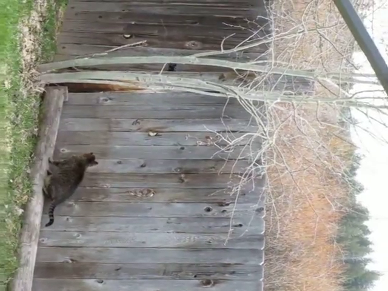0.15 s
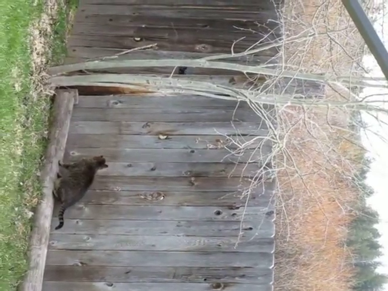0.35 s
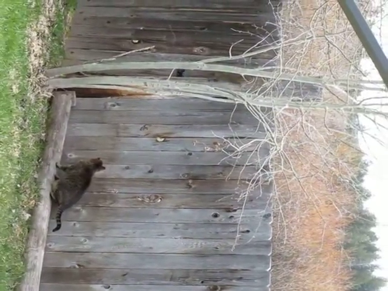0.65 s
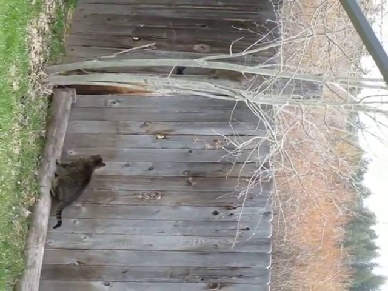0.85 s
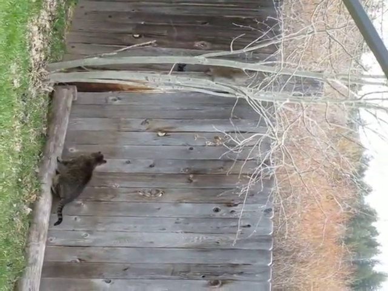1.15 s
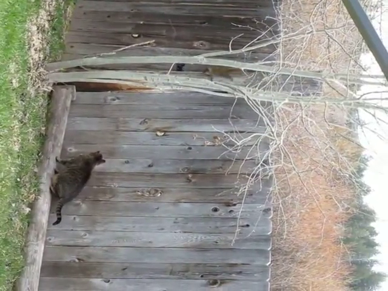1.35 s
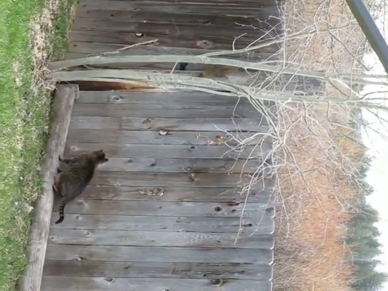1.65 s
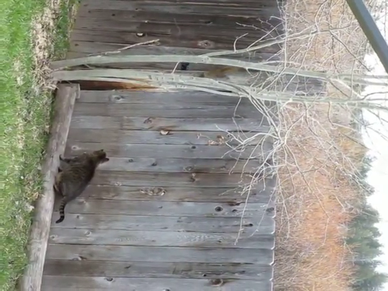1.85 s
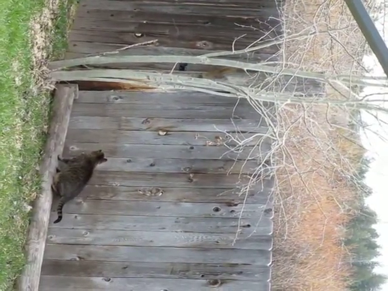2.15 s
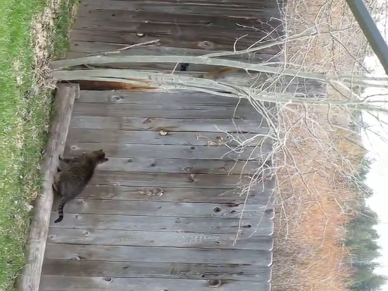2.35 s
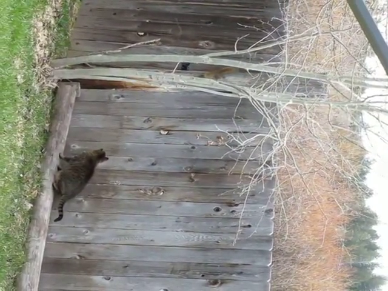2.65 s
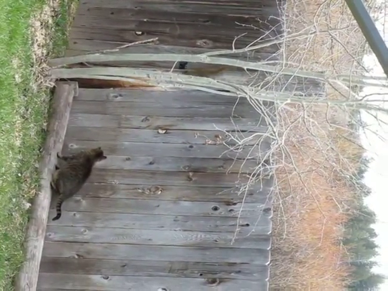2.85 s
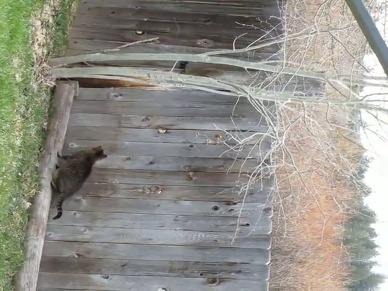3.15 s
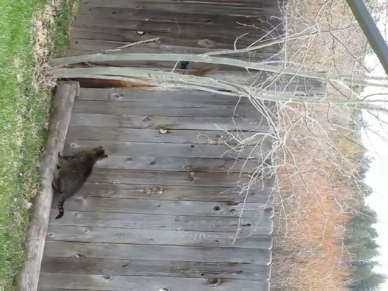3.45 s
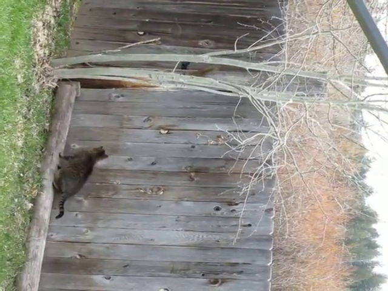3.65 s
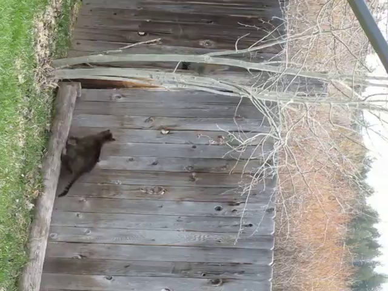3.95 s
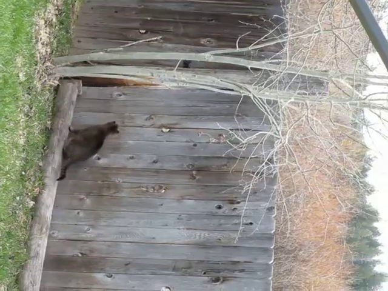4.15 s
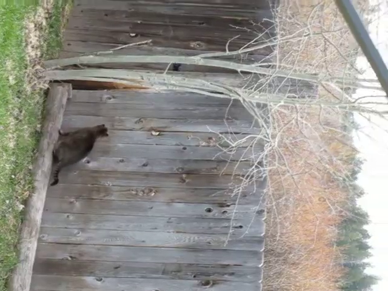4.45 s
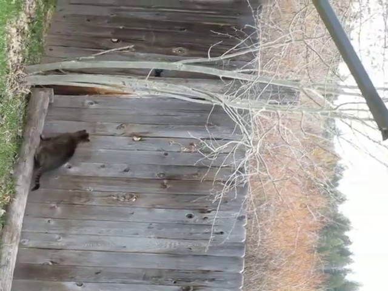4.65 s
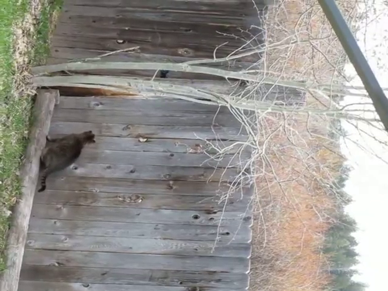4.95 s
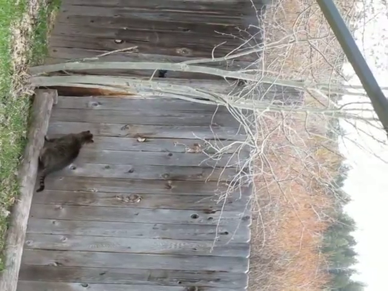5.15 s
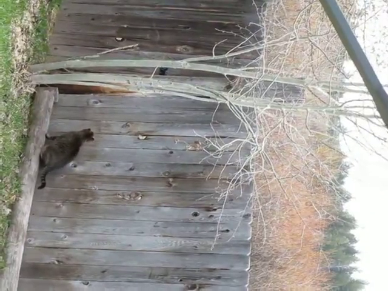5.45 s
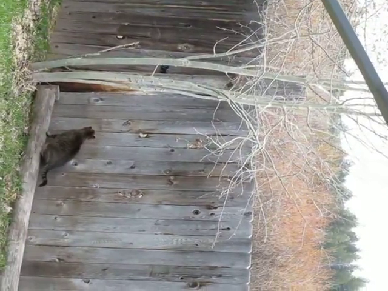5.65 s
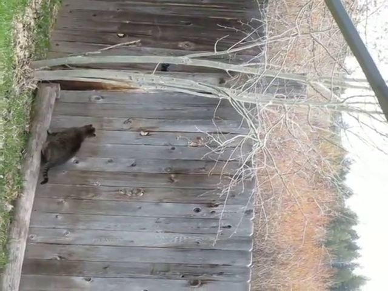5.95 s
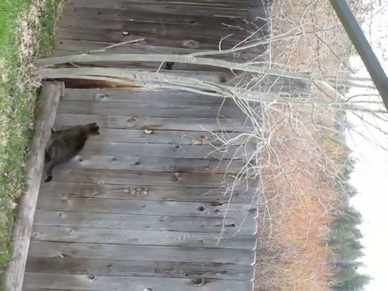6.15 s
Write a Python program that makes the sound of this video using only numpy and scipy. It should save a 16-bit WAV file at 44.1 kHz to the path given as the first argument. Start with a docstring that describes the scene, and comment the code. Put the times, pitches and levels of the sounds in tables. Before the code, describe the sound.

A quiet outdoor yard, heard through a small camera microphone: soft air hush, low wind rumble and a very deep, steady distant engine drone throughout. At 0.5-0.6 s, tiny chips and dry scratchy rustles, rustling again at 1.1. At about 1.2 s a nearby squirrel gives a short, nasal, reedy bark, a quarter second long, falling and turning hoarse, with a faint diffuse echo. Small scratches follow at 1.5, 2.3 and 2.9, then a sharp tick-like scratch with a bright chip at 3.3. The second bark comes at 3.75, running into a thicker rustle and a low bump on the microphone at 4.0 with a wind puff. Thin rising chips sound at 4.7 and more clearly at 5.25, around a faint far hoarse call at 5.1. Scratches at 5.3 and 5.85 precede the third bark at 6.2, with final rustling. Faint high hiss swells occasionally.

```python
"""Squirrel scolding a cat in a yard

A squirrel up a tree gives three nasal, falling barks: harmonics shaped by resonances, with hoarse breath noise.
Scratchy rustles are bursts of grainy noise; birds chip with gliding sines; thin, high hiss swells briefly.
A fence and the trees answer barks and chips with a diffuse tail; a knock and a faint far call come late.
A distant engine drones in low shaft harmonics, and light wind rumbles on the microphone as coloured noise."""
import sys
import numpy as np
from scipy import signal
from scipy.fft import rfft, irfft, next_fast_len
from scipy.io import wavfile
from scipy.ndimage import map_coordinates

SR = 44100
rng = np.random.default_rng(int(sys.argv[2]) if len(sys.argv) > 2 else 0)


def materialize(psi):
    """Save the field psi as 16-bit PCM at rate SR to the path in sys.argv[1].

    A 1-D psi becomes a single channel; in a 2-D psi each row is a channel.
    """
    bounded = np.clip(np.atleast_2d(psi).T, -1, 1)
    quanta = np.round(bounded * 32767).astype(np.int16)
    wavfile.write(sys.argv[1], SR, quanta)


N = 278113

TOP_HZ = 15720  # band limit of the camera
SHAFT_HZ = 32.35  # mean rotation rate of the engine
RUSTLE_T60_S, RUSTLE_LINGER = .13, 8  # 60 dB decay of a sharp scratch; decay gained per second of rise
BARK_RISE_S, BARK_ARCH_S, BARK_RELEASE_S = .046, .094, .055  # swell, time until the pitch sags, fade-out
SCOOP_HZ, SCOOP_S = 30.02, 0.0201  # depth below the top pitch at the start, and time constant of the rise
SAG_S = .09  # time constant of the sinking pitch
SLACK_HZ = 50  # pitch drop at which the voice is fully slack
CATCH_WIDTH_S, CATCH_DB = 0.019, 5  # width and depth of the brief catch in the voice
ONSET_RASP_DB, ONSET_RASP_S = 17, .024  # strength and duration of the hoarse opening puff


def amp(db):
    """Level is logarithmic: decibels to amplitude gain."""
    return 10 ** (np.asarray(db) / 20)


def unit(x):
    """Normalization by effective value: x at rms 1."""
    return x / np.sqrt(np.mean(x ** 2) + 1e-20)


def clock():
    """Uniform sampling: the time of every sample in seconds."""
    return np.arange(N) / SR


def along(points, hz):
    """Interpolation of (Hz, value) points on a logarithmic frequency axis."""
    point_hz, values = np.transpose(points)
    return np.interp(np.log(hz + 1), np.log(point_hz + 1), values)


def wobble(rate):
    """Slow random modulation: a smooth curve through `rate` random knots per second."""
    knots = rng.standard_normal(int(N * rate / SR) + 4)
    return map_coordinates(knots, [clock() * rate])


def filtered(x, response):
    """Linear filtering: multiply the spectrum of x by a function of frequency."""
    size = next_fast_len(N + SR // 2)
    hz = np.fft.rfftfreq(size, 1 / SR)
    return irfft(rfft(x, size) * response(hz), size)[:N]


def noise(spectrum):
    """Spectral shaping of white noise, returned at rms 1."""
    white = rng.standard_normal(N)
    return unit(filtered(white, lambda hz: amp(along(spectrum, hz))))


def narrow(centre_hz, width):
    """Narrow-band noise of rms 1: the response halves `width` Hz from the centre."""
    white = rng.standard_normal(N)
    return unit(filtered(white, lambda hz: 1 / (1 + ((hz - centre_hz) / width) ** 2)))


def turns(hz):
    """Phase is the time integral of angular frequency."""
    return 2 * np.pi * np.cumsum(hz) / SR


def gate(start, length, edge):
    """Amplitude envelope of a note, with straight edges."""
    t = clock()
    attack = np.clip((t - start) / edge, 0, 1)
    release = np.clip((start + length - t) / edge, 0, 1)
    return attack * release


def engine(drift=0.0029, throb=0.052):
    """Periodic rotation radiates harmonics of the shaft rate; machinery adds narrow bands of hum."""
    # engine orders: shaft_multiple, relative_db
    orders = [(1, -29), (2, -46), (3, -58)]
    # far machinery: centre_hz, level_db
    hum_bands = [(119, -67.5), (183.5, -72), (291.5, -79.5)]
    phase = turns(SHAFT_HZ * (1 + drift * wobble(2.72)))
    # phase-locked overtones flatten each crest and sharpen each trough
    drone = sum(amp(db + 2) * np.sin(k * phase + (k - 1) * np.pi / 2) for k, db in orders)
    throbbing = drone * (1 + throb * narrow(12, width=2))
    hum = sum(amp(db) * narrow(hz, width=2.5) for hz, db in hum_bands)
    return throbbing + hum


def wind(buffet_db=-47, air_db=-58.0):
    """Turbulent pressure on the microphone is low-frequency noise, over the nearly even hush of the yard."""
    # puffs of wind: centre_s, width_s, boost_db
    gusts = [(.6, 0.072, 3.4), (1.1, .06, 4.5), (4.02, 0.045, 11), (4.29, .06, 5.3), (5.35, .07, 6.3)]
    # rumble spectrum: frequency_hz, relative_db (per Hz)
    buffet_spectrum = [(8, -25), (20, 13), (30, 0.5), (44, -2.5), (54, -29), (76, 3), (90, -16.5),
                       (110, -30), (200, -56)]
    # hush spectrum: frequency_hz, relative_db (per Hz)
    air_spectrum = [(59, -30.5), (100, 1.5), (156, -10), (188, -10), (259, -16.5), (294, -12.5),
                    (430, -19.5), (467, -16.5), (590, -19.5), (1000, -18), (1110, -20), (1370, -21),
                    (6420, -30), (7760, -30), (15600, -39.5)]
    t = clock()
    boost_db = sum(db * np.exp(-((t - s) / width) ** 2) for s, width, db in gusts)
    buffeting = amp(buffet_db + boost_db) * noise(buffet_spectrum)
    hush = amp(air_db + 0.67 * wobble(4.03)) * noise(air_spectrum)
    return buffeting + hush


def thin_hiss(steady_db=-76):
    """Narrow-band noise: thin, high hiss near 7.6 kHz swells briefly over a faint, nearly steady band."""
    # swells of hiss: start_s, length_s, level_db
    hiss_bursts = [(.72, .18, -71), (1.66, 0.23, -73), (2.68, 0.24, -73), (4.72, .16, -74),
                   (5.66, 0.25, -74)]
    envelope = sum(amp(db) * gate(s, length, 0.032) for s, length, db in hiss_bursts)
    swelling_hiss = envelope * narrow(7635, width=190)
    steady_hiss = amp(steady_db + 1.4 * wobble(6.12)) * narrow(7770, width=580)
    return swelling_hiss + steady_hiss


def chips(waver=0.014):
    """Frequency modulation: each chip glides exponentially onto its note, buzzing with fast pitch jitter."""
    # chips: start_s, length_s, start_hz, end_hz, level_db, octave_db (re the fundamental)
    chip_notes = [ (0.493, 0.01, 7600, 6370, -58, -31.5), (0.598, 0.041, 2820, 2970, -58.5, -12),
                  (0.614, 0.05, 2970, 2980, -66, 3.5), (1.482, 0.025, 3150, 3200, -66, -25),
                  (3.278, 0.012, 4970, 4870, -62, -21), (3.292, 0.0064, 7800, 6340, -53, -25),
                  (4.671, 0.019, 2700, 3100, -60.5, 0), (4.684, 0.017, 5960, 7100, -65, -30),
                  (4.685, 0.062, 4500, 5200, -59.5, -22), (5.237, 0.015, 2647, 3150, -54.5, -14),
                  (5.25, 0.075, 4330, 5044, -52.5, -29), ]
    t, out = clock(), np.zeros(N)
    unsteady = 1 + waver * wobble(700)
    for s, length, start_hz, end_hz, db, octave_db in chip_notes:
        slide = np.exp(-np.clip(t - s, 0, 1) / min(.007, length / 2))
        pitch = end_hz + (start_hz - end_hz) * slide
        phase = turns(pitch * unsteady)
        tone = np.sin(phase) + amp(octave_db) * np.sin(2 * phase)
        out += amp(db) * gate(s, length, length / 5) * tone
    return out * amp(1.1 * wobble(130))


def yard(x):
    """Diffuse scattering from fence and trees: a 10 ms delay, then noise decaying by frequency."""
    # reverberation: frequency_hz, t60_s
    decay_times = [(200, 0.4), (2000, 0.66), (5000, 0.49), (12000, 0.22)]
    hz, t, cells = signal.stft(rng.standard_normal(SR // 2), SR, nperseg=256)
    decay = amp(-60 * t / along(decay_times, hz)[:, None])
    tail = signal.istft(cells * decay, SR, nperseg=256)[1]
    response = np.pad(tail / np.linalg.norm(tail), (SR // 100, 0))
    return signal.fftconvolve(x, response)[:N]


def rustles(grain_db=2.5, clump_db=1, crackle_db=3.0):
    """Friction as modulated noise: fine dry scratches over a duller, coarser woody body; slow ones linger."""
    # rustles: peak_s, level_db, rise_s (per 20 dB), body_db (woody body re level)
    rustle_bursts = [ (.62, -60.5, 0.029, -2), (.655, -55.5, .021, -6), (1.105, -56.5, 0.018, -1),
                     (1.15, -57, 0.03, -2.5), (1.497, -58, .007, 1), (1.53, -61.5, .02, -2),
                     (2.31, -63.5, .031, -7), (2.881, -61, 0.0068, 6.5), (2.91, -61.5, .015, 1),
                     (3.299, -52, .0012, -7), (3.33, -58, .018, -0.5), (3.83, -56, .003, 1),
                     (3.875, -62, .03, 0), (3.914, -58.5, .006, 5.5), (3.935, -53.5, 0.04, -0.5),
                     (3.98, -53, 0.036, 0), (4.01, -55.5, .014, 3.5), (4.045, -58, 0.026, 1.5),
                     (4.28, -74, 0.033, 11), (4.74, -63.5, 0.065, -0.5), (4.86, -67, 0.034, 1.5),
                     (5.321, -53, .012, -5.5), (5.355, -58.5, 0.028, -0.5), (5.8, -64.5, .03, 3.5),
                     (5.852, -57.5, .012, -9), (6.23, -59.5, .028, 1.5), (6.27, -58, 0.023, 1), ]
    # dry scratch spectrum: frequency_hz, relative_db (per Hz)
    scratch_spectrum = [(2000, -11), (3500, -10.5), (4400, -5.5), (4950, -3.5), (5500, -5), (7000, -6),
                        (7800, 1.5), (8500, 4), (9500, -4.5), (10700, -11.5), (13000, -29), (15500, -39)]
    # woody body spectrum: frequency_hz, relative_db (per Hz)
    wood_spectrum = [(150, 0), (400, -25), (620, 2), (780, -6.5), (1050, 2.5), (1300, -2), (1600, -6),
                     (2200, -5.5), (2650, -9.5), (3050, -7), (3700, -14), (7000, -34)]
    t = clock()
    bright, dull = np.zeros(N), np.zeros(N)
    for s, db, rise, body_db in rustle_bursts:
        t60 = RUSTLE_T60_S + RUSTLE_LINGER * rise
        rise_db = -20 * np.maximum(s - t, 0) / rise
        decay_db = -60 * np.maximum(t - s, 0) / t60
        power = amp(db + rise_db + decay_db) ** 2
        # incoherent bursts add in power
        bright += power
        dull += power * amp(body_db) ** 2
    grains = unit(amp(grain_db * wobble(900) + clump_db * wobble(120)))
    scratches = grains * noise(scratch_spectrum)
    crackles = unit(amp(crackle_db * wobble(250))) * noise(wood_spectrum)
    return np.sqrt(bright) * scratches + np.sqrt(dull) * crackles


def bark(start, length, top_hz, drop_hz, db, fade, catch_s, jitter=0.0052, rough=0.2, even_db=-7,
         rasp_db=-20, slack_db=13, ragged_db=1.7, follow=0.88, count=15):
    """Source-filter voice: harmonics scoop up and sag; the mouth resonance sinks too, the nasal one stays."""
    # mouth resonance at the top of a bark: frequency_hz, gain_db
    mouth = [(600, -32), (930, -26), (1240, -6), (1550, 0), (1860, -3), (2170, -14), (2480, -25),
             (3100, -38), (4500, -55)]
    # fixed nasal resonance: frequency_hz, gain_db
    nose = [(2800, -63), (3230, -34), (3360, -18), (3650, -23), (4050, -32), (4500, -48)]
    # breath spectrum: frequency_hz, relative_db (per Hz)
    rasp_spectrum = [(600, -15), (1150, -11), (1500, -7), (2100, -9), (2600, -29), (3600, -16), (6000, -32)]
    age = np.clip(clock() - start, 0, length + BARK_RELEASE_S)
    tiring = np.maximum(age - BARK_ARCH_S, 0)
    sag = drop_hz * (1 - np.exp(-tiring / SAG_S))
    pitch = top_hz - SCOOP_HZ * np.exp(-age / SCOOP_S) - sag
    phase = turns(pitch * (1 + jitter * wobble(150)))
    opening = (pitch / pitch.max()) ** follow
    voice = np.zeros(N)
    for k in range(2, count):  # the fundamental is absent
        throat = amp(along(mouth, k * pitch / opening)) + amp(along(nose, k * pitch))
        # the pinched, reedy source favours odd harmonics
        reed = amp(even_db * (k % 2 == 0)) * (1 + rough * wobble(70))
        voice += throat * reed * np.sin(k * phase)
    # air escapes in one puff per cycle, more so at the onset and where the voice is slack and low
    rasp = unit(noise(rasp_spectrum) * (1 + np.cos(phase)))
    onset_db = ONSET_RASP_DB * np.exp(-(age / ONSET_RASP_S) ** 2)
    hoarse = amp(rasp_db + slack_db * sag / SLACK_HZ + onset_db)
    catch = CATCH_DB * np.exp(-((age - catch_s) / CATCH_WIDTH_S) ** 2)
    # the fade-out is centred on the nominal end
    release = np.clip((length - age) / BARK_RELEASE_S + .5, 0, 1)
    swell = np.minimum(age / BARK_RISE_S, 1) * release
    effort = swell * amp(db - fade * tiring - catch + ragged_db * wobble(80))
    return effort * (unit(voice) + hoarse * rasp)


def squirrel():
    """Superposition of barks produced by one vocal mechanism."""
    # barks: start_s, length_s, top_hz, drop_hz, level_db, fade_db_per_s, catch_s (after the start)
    calls = [(1.225, .238, 310.4, 54, -49, 36, .17), (3.751, .2, 306, 23.8, -47.3, 22, 0.13),
             (6.182, .2, 312.5, 50, -48, 25, .1)]
    return sum(bark(*row) for row in calls)


def knocks(tick_db=-18, ring_hz=35):
    """Impulse response to a touch on the camera: a sharp step, a damped low swing and a tiny noise tick."""
    # knocks: start_s, level_db
    touches = [(3.999, -32.5)]
    out = np.zeros(N)
    for s, db in touches:
        t = np.maximum(clock() - s, 0)
        push = np.exp(-t / 0.006) * np.cos(2 * np.pi * ring_hz * t)
        tick = amp(tick_db) * np.exp(-t / .0007) * rng.standard_normal(N)
        out += amp(db) * (t > 0) * (push + tick)
    return out


def far_calls():
    """Distance blurs a faint, hoarse call into a narrow band of hiss."""
    # calls: start_s, length_s, centre_hz, level_db
    hoarse_calls = [(5.11, 0.24, 1370, -67)]
    return sum(amp(db) * gate(s, length, 0.045) * narrow(hz, width=220)
               for s, length, hz, db in hoarse_calls)


def scene():
    """Direct-to-reverberant ratio conveys distance: the squirrel is near and fairly dry, the birds farther."""
    barks, birds = squirrel(), chips()
    echo = yard(amp(-12.0) * barks + amp(-7) * birds)
    animals = barks + birds + echo + rustles() + far_calls()
    return (animals + thin_hiss() + knocks() + engine() + wind())[None]


def record(dry):
    """Band limiting: the camera keeps nothing above its top frequency."""
    return filtered(dry[0], lambda hz: hz < TOP_HZ)[None]


dry = scene()
out = record(dry)
materialize(out)
```